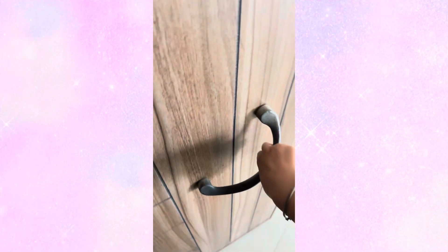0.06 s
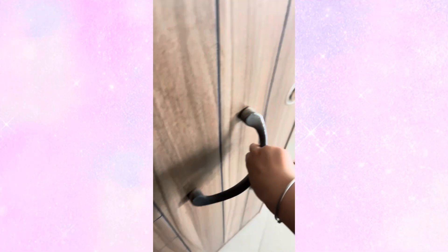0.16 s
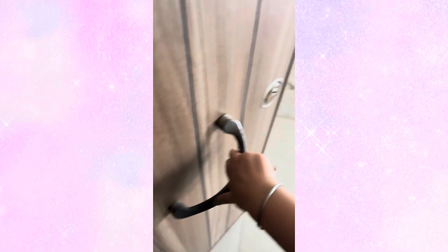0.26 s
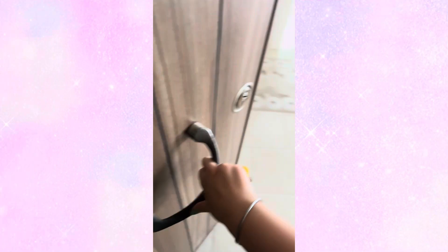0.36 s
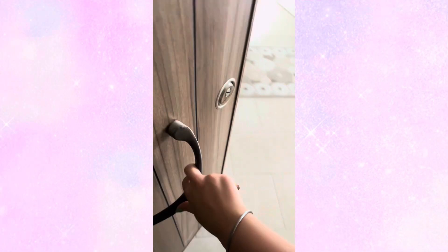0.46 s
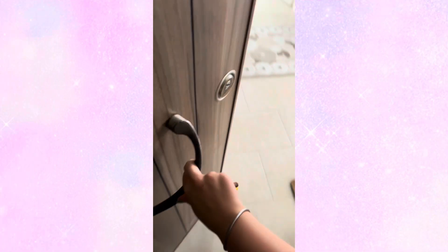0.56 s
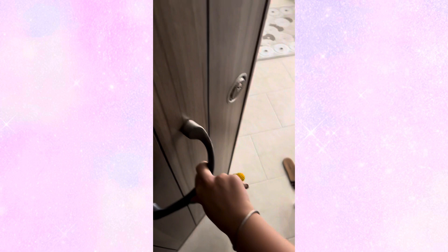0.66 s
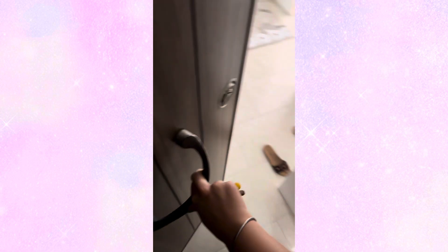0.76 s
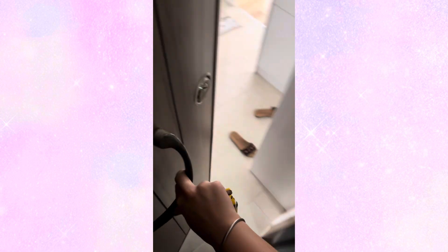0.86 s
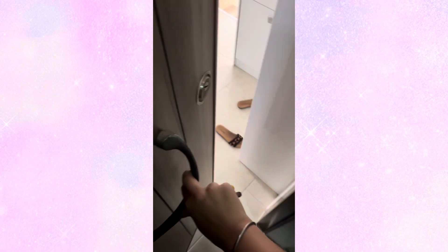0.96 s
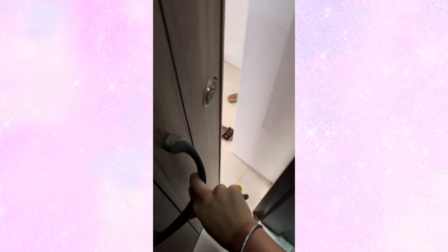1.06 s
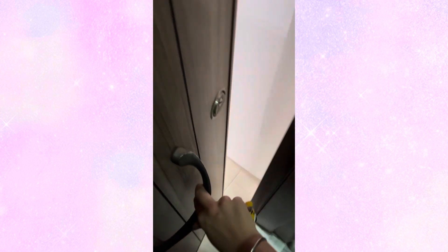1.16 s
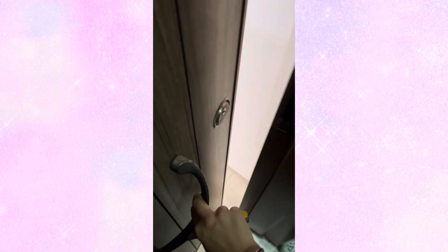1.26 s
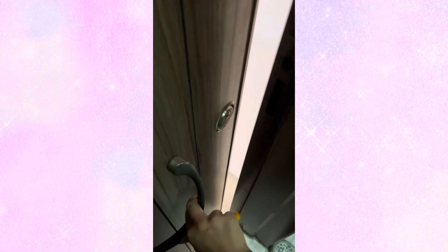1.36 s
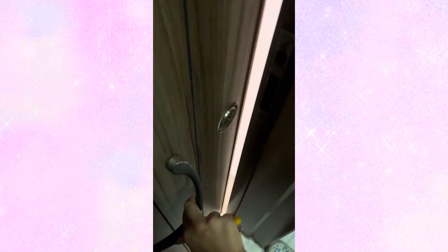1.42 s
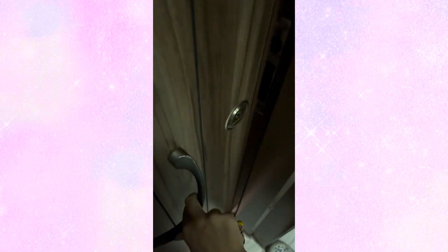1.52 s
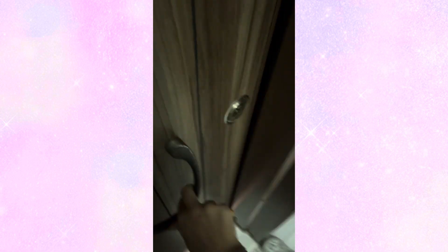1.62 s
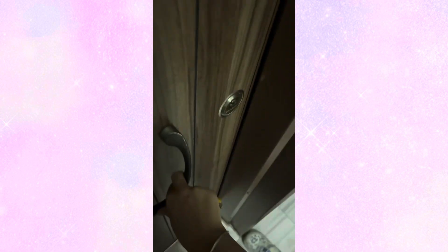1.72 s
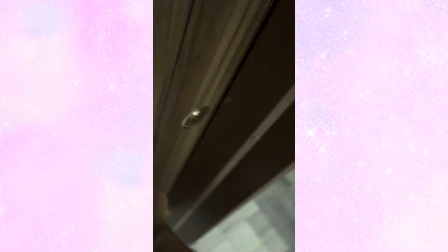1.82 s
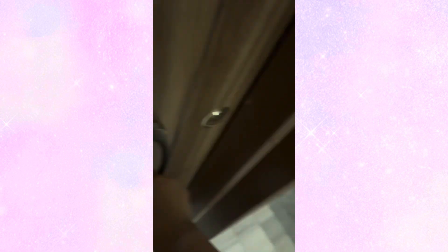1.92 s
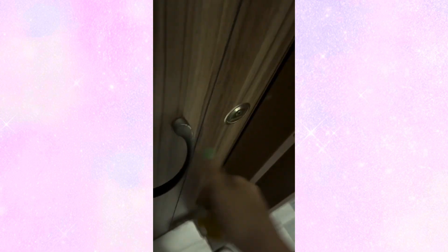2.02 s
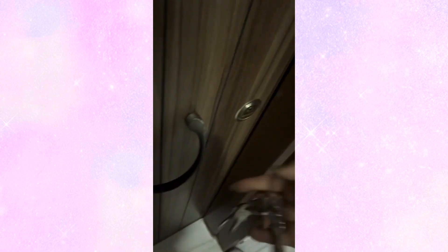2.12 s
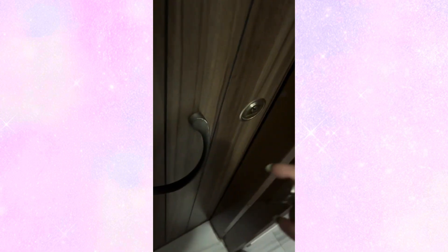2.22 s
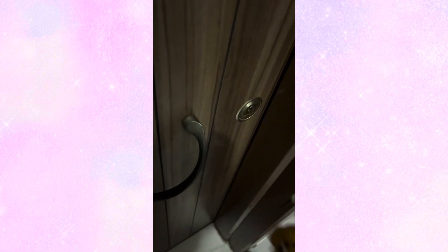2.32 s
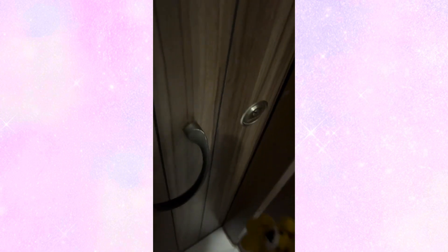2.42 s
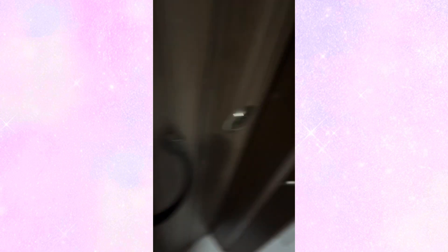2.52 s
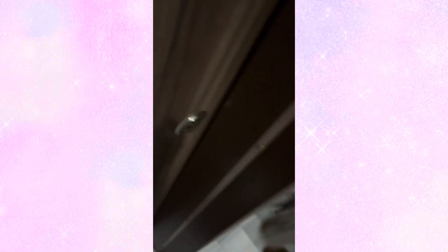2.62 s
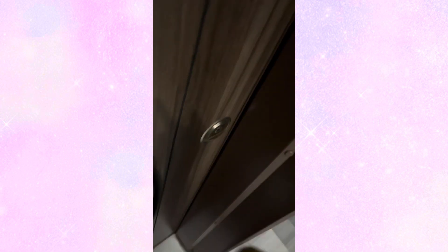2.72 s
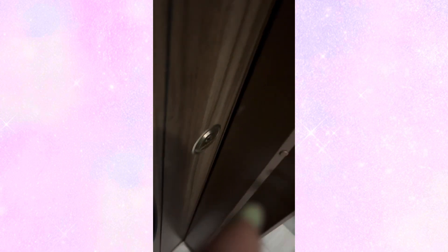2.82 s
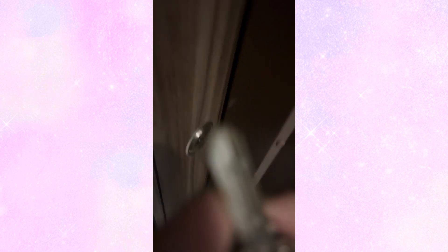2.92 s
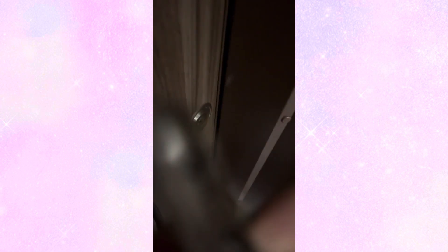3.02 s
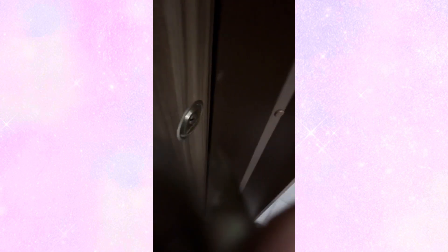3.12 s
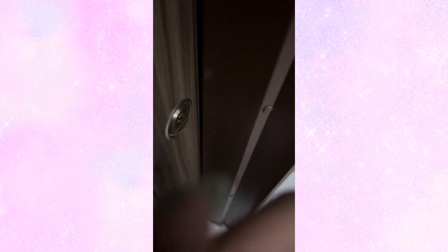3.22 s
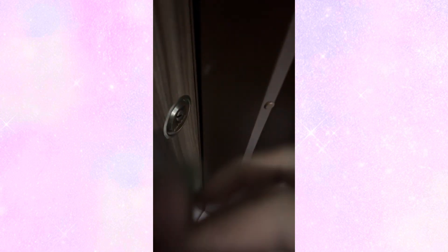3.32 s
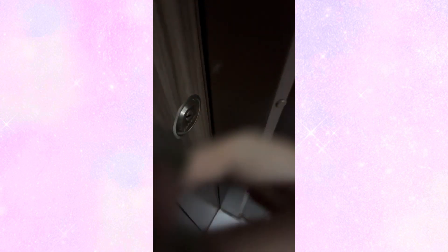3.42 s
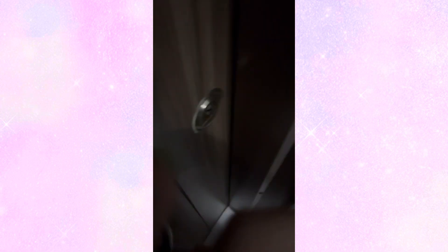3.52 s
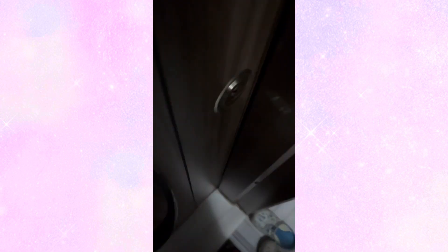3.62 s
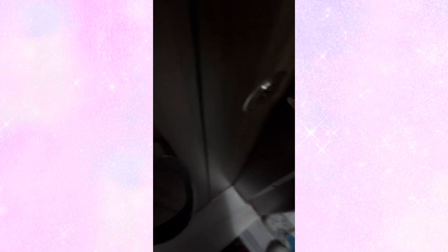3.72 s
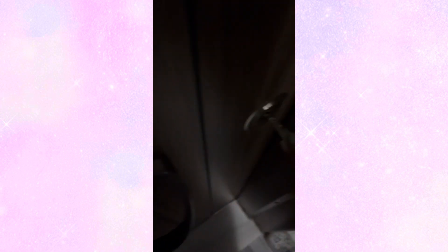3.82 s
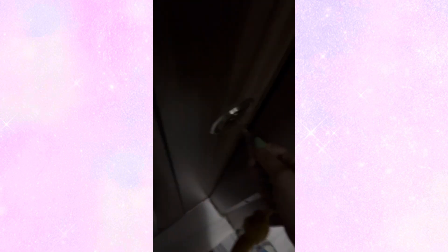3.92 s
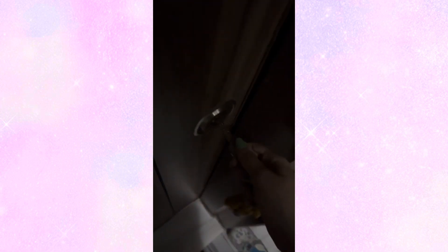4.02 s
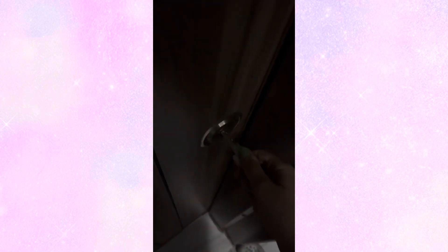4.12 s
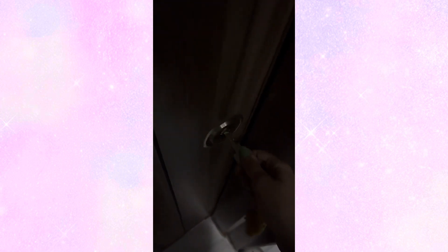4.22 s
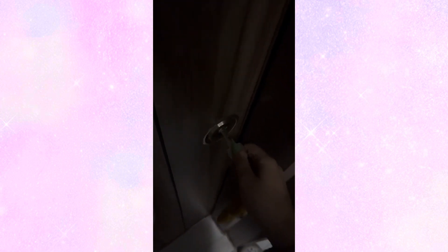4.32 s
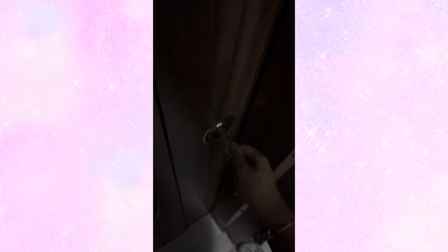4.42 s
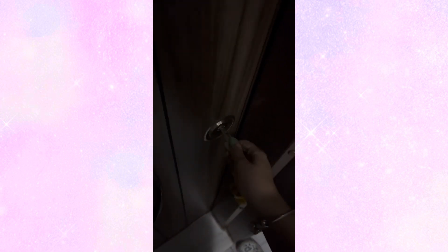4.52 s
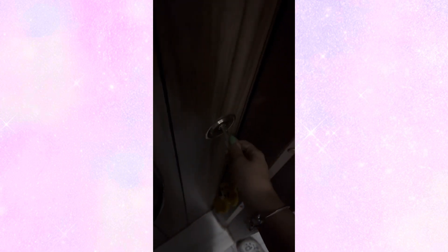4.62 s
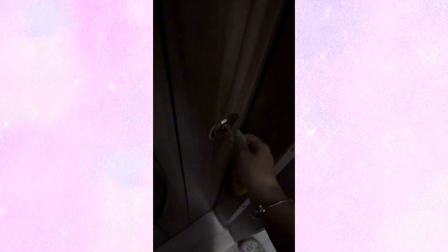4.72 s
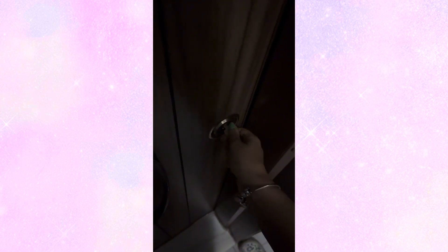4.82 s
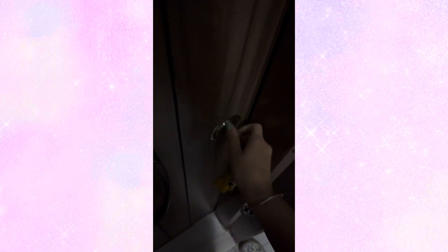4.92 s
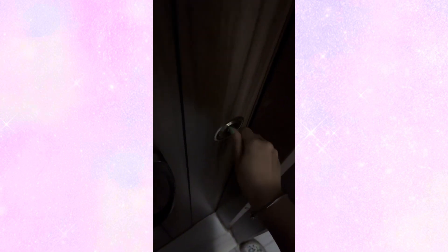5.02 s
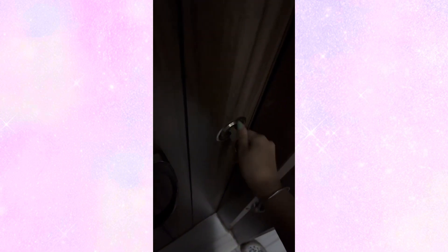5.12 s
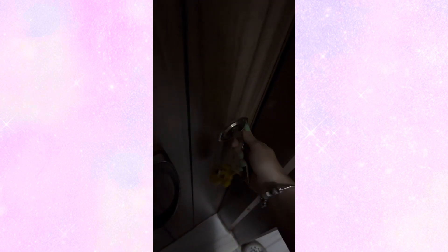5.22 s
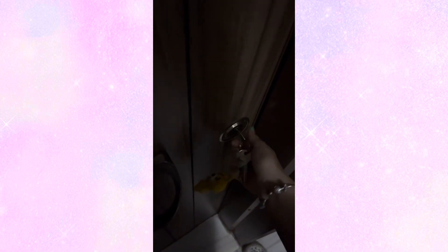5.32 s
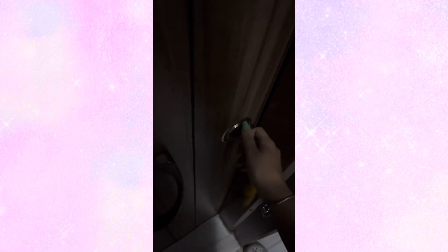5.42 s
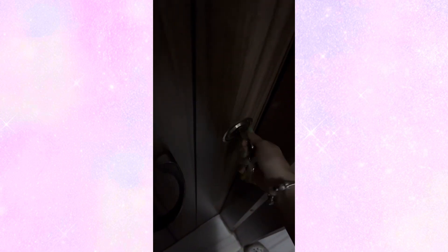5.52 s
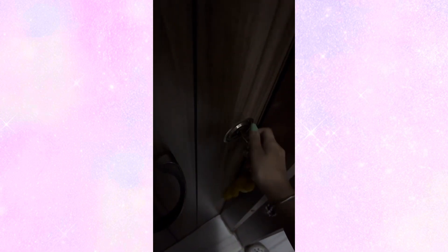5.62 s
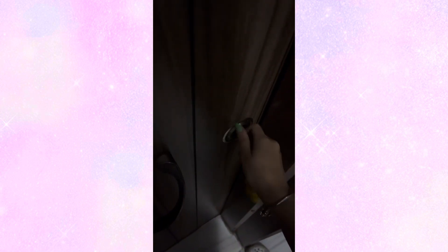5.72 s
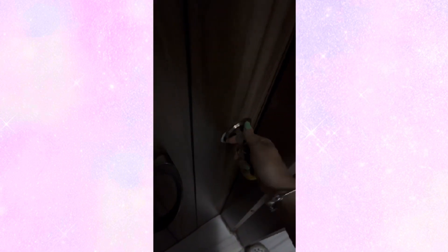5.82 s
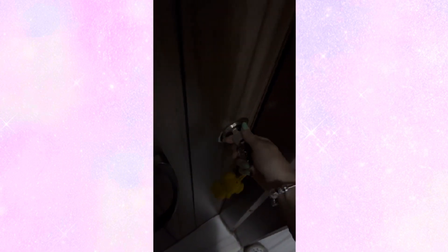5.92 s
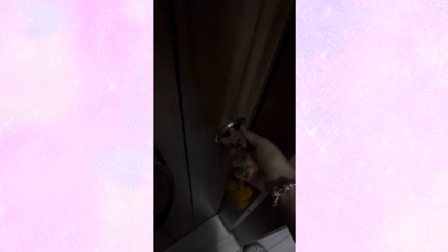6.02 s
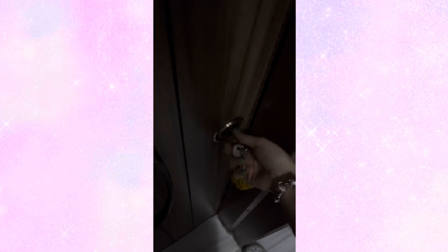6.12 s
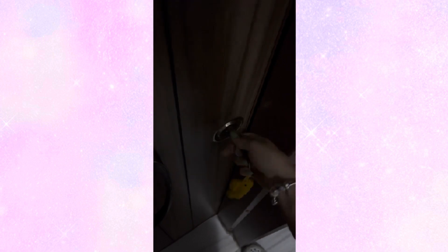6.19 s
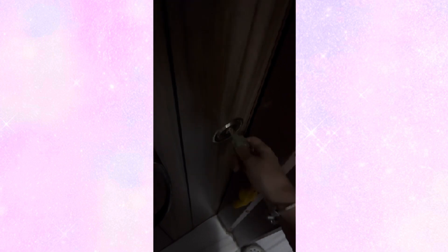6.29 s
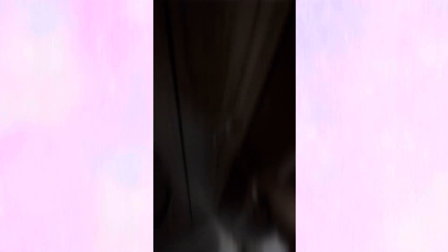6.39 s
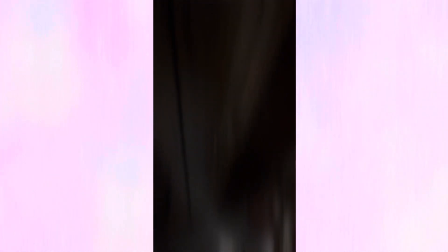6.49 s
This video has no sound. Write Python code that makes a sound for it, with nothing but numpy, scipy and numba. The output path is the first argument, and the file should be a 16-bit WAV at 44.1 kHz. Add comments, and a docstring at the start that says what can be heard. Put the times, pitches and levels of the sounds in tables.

```python
"""First a hand rustles on a wooden front door and keys clink faintly; then the door is pulled shut on its
latch, the bunch swings and jangles, and a key slides into the lock and throws the bolt. Each blow rings
the metal lock, the panels and the door leaf; brass keys tick and ring until fingers damp them; seal and
knuckles bump softly. A hard stairwell answers, and a phone close by hears it all through two ports."""
import sys
import numpy as np
from scipy import signal
from scipy.fft import rfft, irfft, next_fast_len
from scipy.io import wavfile
from numba import njit

SR = 44100
rng = np.random.default_rng(int(sys.argv[2]) if len(sys.argv) > 2 else 0)


def transcribe(u):
    """Save the signal u as a 16-bit wav file named by the first command-line argument.

    u: samples, shape (n,) or (channels, n), limited to [-1, 1]; the rate is SR.
    q: integer samples, one column per channel.
    """
    v = np.clip(np.atleast_2d(u).T, -1, 1)
    q = np.round(v * 32767).astype(np.int16)
    wavfile.write(sys.argv[1], SR, q)


N = 289031

# Fader rides for skin and sleeve rubbing, the leaf murmuring under the hand, the phone's low sway and
# the swinging keys. Each row: time in seconds, relative level in dB.
RUB_RIDE = [(0.0, -52), (0.148, -66.5), (0.388, -66), (0.532, -72), (0.86, -62), (0.98, -73.5),
            (1.18, -65.5), (1.338, -61.5), (2.45, -63), (2.92, -69.5), (3.06, -59.5), (3.35, -71.5),
            (3.5, -64), (3.66, -69), (3.9, -64.5), (4.36, -81), (4.95, -68), (5.11, -51), (5.75, -54),
            (5.954, -63), (6.176, -63.5), (6.306, -52), (6.55, -72)]
MURMUR_RIDE = [(0.0, -44.5), (0.3, -57), (1.2, -79), (1.62, -76), (1.77, -28), (1.9, -32), (2.24, -51),
               (2.75, -65.5), (3.19, -70), (3.4, -52.5), (3.5, -70), (3.72, -72), (3.84, -50), (4.5, -56),
               (4.92, -37), (5.06, -46), (5.22, -34.5), (5.6, -38.5), (5.85, -38), (6.2, -47), (6.31, -39),
               (6.42, -62), (6.55, -55)]
SWAY_RIDE = [(0.0, -76), (1.2, -84), (1.62, -50), (1.9, -39), (2.24, -65), (2.53, -56), (2.7, -49),
             (2.85, -62), (3.2, -57), (3.42, -42.5), (3.7, -76), (4.23, -48.5), (4.55, -51.5), (4.65, -67),
             (4.73, -31), (4.92, -31), (5.06, -53), (5.35, -59), (6.2, -71), (6.35, -53), (6.55, -61)]
SWING_RIDE = [(0.0, -85), (0.36, -61), (0.56, -72.5), (1.48, -68.5), (1.8, -51), (1.9, -61), (2.53, -59.5),
              (2.7, -47), (2.83, -57.5), (3.34, -74.5), (3.44, -56), (3.7, -63), (4.65, -93), (4.72, -42),
              (4.9, -79), (5.05, -49), (5.22, -59), (5.31, -46), (5.75, -53.5), (5.95, -65), (6.2, -61),
              (6.31, -45.5), (6.55, -67)]
# Soft bumps of door seal, palm and knuckles.
# Each row: start in seconds, relative level in dB, pitch in Hz, t60 in seconds.
BUMPS = [(0.054, -35, 168.5, 0.12), (1.607, -18, 339, 0.3), (1.68, -15, 274, 0.2),
         (1.802, -6.5, 225.7, 0.089), (1.83, -24, 152.2, 0.4), (2.65, -38, 74.3, 0.2),
         (3.32, -11, 114, 0.056), (3.386, -21, 46.6, 0.099), (3.773, -19, 173.2, 0.15),
         (4.135, -47.5, 224, 0.15), (4.546, -30, 214, 0.18), (4.72, -30, 116, 0.17),
         (4.778, -17, 281.4, 0.21), (4.829, -19, 100, 0.19), (4.829, -25, 295.3, 0.21),
         (5.3, -19.5, 417.4, 0.24), (5.627, -20, 221, 0.16), (6.078, -21.5, 177, 0.088),
         (6.334, -19, 131, 0.097), (6.384, -14, 100, 0.073)]
# Keys meeting on the ring.
# Each row: start in seconds, relative level in dB, contact spread in ms, t60 of finger damping in ms.
KEY_CLINKS = [(0.219, -57, 2.3, 60), (0.228, -45, 6.4, 190), (0.365, -54, 12, 100), (0.485, -55.5, 15, 130),
              (1.003, -55.5, 5.8, 55), (2.037, -45.5, 7, 120), (2.054, -42.5, 12, 80), (2.165, -39, 18, 95),
              (2.2, -45, 7.2, 170), (2.226, -30, 1.7, 34), (2.237, -32.5, 2.6, 220),
              (2.368, -34.5, 0.78, 27), (2.45, -35.5, 0.8, 270), (2.471, -41.5, 3.4, 210),
              (2.659, -41.5, 2.1, 29), (2.683, -41, 14, 53), (2.787, -36, 4.1, 28), (2.872, -39, 2, 190),
              (2.925, -45, 3, 20), (2.977, -50, 2.3, 68), (2.99, -39.5, 12.4, 46), (3.127, -48.5, 0.99, 14),
              (3.27, -44.5, 4, 60), (3.296, -37.5, 1.5, 25), (3.309, -44, 4.7, 55), (3.327, -30, 1.8, 8.3),
              (3.35, -45, 5.8, 40), (3.369, -27, 8.1, 160), (3.397, -20.5, 1.07, 800),
              (3.406, -25.5, 5.7, 930), (3.465, -30, 3.8, 1200), (3.49, -39, 10, 540),
              (3.537, -35, 10, 150), (3.573, -28.5, 9.3, 180), (3.594, -40, 2.6, 84), (3.612, -35, 4.7, 34),
              (3.631, -28, 0.54, 67), (3.634, -29, 5.8, 28), (3.687, -44, 2.4, 19), (3.916, -38, 4.5, 52),
              (4.733, -38.5, 6, 86), (4.807, -24, 5.5, 58), (4.869, -36, 7, 130), (5.168, -44, 3.4, 47),
              (5.67, -38.5, 16, 270), (6.255, -48, 7.8, 84), (6.35, -52, 7.2, 95)]
# Blows and drags on latch, lock and handle.
# Each row: start in seconds, relative metal, wood and treble levels in dB, contact spread in ms.
DOOR_BLOWS = [(0.308, -51, -48.5, -71, 2.8), (0.359, -54, -56, -57, 10.5), (0.452, -36, -42.5, -79, 0.93),
              (0.703, -46, -46.5, -78, 1.6), (0.754, -47, -55.5, -70, 2.3), (0.988, -57, -79, -51, 1.2),
              (1.178, -47, -77, -64, 4.1), (1.329, -53, -83, -65.5, 3.7), (1.528, -50, -53.5, -83, 8.1),
              (1.592, -24.5, -46, -54, 8.1), (1.606, -14, -23.5, -27, 5.9),
              (1.675, -16.5, -19, -16.5, 3.85), (1.686, -19, -24, -47, 4), (1.781, -23.5, -31.5, -31, 12),
              (1.796, -12.5, -24, -18.5, 6.5), (3.058, -52, -57, -57, 11.4), (3.334, -41, -51, -51, 16),
              (3.841, -27.5, -32.5, -47, 1.53), (3.919, -36.5, -65, -37.5, 4.7),
              (3.969, -38.5, -47.5, -38.5, 3.9), (4.053, -47, -58, -55, 2.7), (4.067, -38, -50.5, -38, 18),
              (4.142, -38, -46, -36, 4), (4.15, -36, -51.5, -41, 13), (4.282, -41, -50.5, -43, 9.3),
              (4.294, -29.5, -44, -35, 3.9), (4.512, -48, -64, -49, 9.3), (4.528, -33, -46.5, -37.5, 2.4),
              (4.701, -54, -49, -44, 5.8), (4.719, -50, -44.5, -45, 2.8), (4.733, -43.5, -44, -53, 11),
              (4.755, -35, -42.5, -34.5, 16), (4.799, -38, -31.5, -26.5, 2), (4.8, -23, -33.5, -45, 5),
              (4.956, -47, -47, -47.5, 2.7), (5.03, -34.5, -48, -34.5, 9.4),
              (5.046, -30.5, -49, -39.5, 9.8), (5.151, -31, -48.5, -33.5, 4.6), (5.21, -28, -32, -40, 4.2),
              (5.227, -32, -33, -64, 8), (5.269, -30.5, -24.5, -58, 7.3), (5.287, -18.5, -19.5, -24.5, 1.9),
              (5.291, -23.5, -19, -45, 4.2), (5.296, -14.5, -21, -47, 0.96),
              (5.306, -23.5, -26.5, -57, 7.7), (5.364, -45, -33.5, -28.5, 4), (5.46, -42, -31.5, -42, 3.7),
              (5.538, -36, -39, -59, 6.7), (5.608, -58, -38.5, -38, 2.8), (5.668, -74, -38.5, -41.5, 6.3),
              (5.727, -38.5, -46, -36.5, 1.5), (5.75, -40, -44, -44, 13.4), (5.855, -34, -42, -35.5, 7.1),
              (5.983, -64, -46.5, -49, 0.84), (6.127, -46.5, -49.5, -46, 3.8),
              (6.144, -37, -48, -44.5, 14.3), (6.245, -60, -50.5, -47, 3), (6.262, -44, -47, -38, 9.1),
              (6.292, -44, -51, -43, 10), (6.338, -29, -35, -31.5, 1.8), (6.35, -28, -59, -39.5, 2.7),
              (6.396, -47, -69, -41, 1.7), (6.523, -46.5, -52, -46, 13)]
# Resonances of the door leaf, the key blades, the lock case and the door panels.
# Each row: pitch in Hz, relative level in dB, free-ringing t60 in seconds.
LEAF_MODES = [(51, -44, 0.067), (112.9, -13.5, 0.31), (149, -6.5, 0.26), (190.6, -7, 0.18),
              (226.6, -1, 0.46), (242, 3, 0.061), (270.8, 2.5, 0.19), (310.6, -10.5, 0.29),
              (348.4, -4.5, 0.14), (410.6, -2.5, 0.048)]
BLADE_MODES = [(2150, -22, .06), (4050, -22, .12), (5110, -18, .15), (5320, -22, .12), (6195, -5, .3),
               (6512, -4, .4), (7100, -18, .15), (7610, -9, .3), (8845, -3, .35), (9160, -10, .2),
               (10200, -14, .15), (10890, -3, .4), (11020, -11, .2), (11605, -10, .2), (11650, -5, .3),
               (11680, -8, .2), (11990, -9, .12), (12300, -10, .08), (12520, -7, .06), (12850, -9, .12),
               (13160, -11, .1), (13622, -3, .25), (13990, -11, .12), (14330, -5, .25), (14355, -2, .25),
               (14950, -9, .2), (15220, -8, .2), (15325, -3, .25), (15700, -8, .15)]
CASE_MODES = [(1500, -5, .04), (1900, -8, .03), (2230, -6, .03), (2400, -5, .035), (2790, -6, .03),
              (2940, -6, .03), (3285, -4, .035), (3600, -7, .03), (4030, -6, .03), (4200, -8, .03),
              (4620, -8, .025), (5180, -10, .025)]
WOOD_PANEL_MODES = [(428, -4, .09), (549, -6, .07), (650, -7, .06), (730, -7, .05), (884, -4, .06),
                    (930, -5, .05), (1033, -6, .04), (1180, -7, .04), (1380, -6, .04)]
# Tone curves for room air, skin rub, key tick, metal crack, wooden knock and a blow's bright sheen.
# Each row: frequency in Hz, relative gain in dB.
AIR_EQ = [(20, -27), (40, -5), (145, 10.5), (500, 0.5), (960, -4), (2840, -9.5), (6000, -23), (9500, -30),
          (13000, -15), (16000, -36)]
RUB_EQ = [(180, -31.5), (300, -21), (412, -10), (885, -6), (1190, -4), (2000, -5.5), (3030, -1),
          (9710, -20), (16000, -29)]
TICK_EQ = [(2500, -17), (6000, -3.5), (9000, -5), (11500, 8), (12600, -3.5), (13800, 4.5), (15500, -20.5)]
CRACK_EQ = [(700, -61), (1500, -5), (2500, -0.5), (4500, -4), (7000, -13), (14000, -20)]
KNOCK_EQ = [(200, -50), (450, -2.5), (900, 1), (1500, -4), (2500, -33)]
SHEEN_EQ = [(4000, -17), (6000, -4), (9000, 1.5), (12500, -2.5), (15500, 4)]
# The stairwell's tail. Each row: band centre in Hz, t60 in seconds, relative level in dB.
STAIRWELL_BANDS = [(61.7, 0.33, -20), (152, 1, -9), (385, 0.87, -14), (787, 1, -16.5), (1630, 0.95, -16),
                   (3800, 0.71, -15), (6100, 0.74, -19.5), (12100, 0.23, -16.5)]
# Stereo width of the ports. Each row: frequency in Hz, share of the left-right difference kept.
PORT_WIDTH = [(40, 0.37), (150, 0.19), (300, 0.63), (700, 0.9), (2500, 0.82), (4500, 1), (5500, 0.59),
              (9000, 0.16), (15000, 0.6)]

KEY_IN_S = 3.8  # from here on the bunch hangs at the lock
TREBLE_HZ, TREBLE_LAG_S, TREBLE_TURN_RAD = 4300, .000227, -1.15  # right port against left
LOW_CUT_HZ, TOP_HZ = 100, 15800


def undb(db):
    return 10 ** (np.asarray(db) / 20)


def level(x, db):
    """Set the rms."""
    return x * undb(db) / np.sqrt(np.mean(x ** 2))


def fader(ride):
    """A ride's gain at every sample."""
    return undb(np.interp(np.arange(N) / SR, *np.transpose(ride)))


def per_bin(table, size):
    """A frequency curve read at every bin of a transform."""
    hz, value = np.transpose(table)
    return np.interp(np.log(np.fft.rfftfreq(size, 1 / SR) + 1), np.log(hz), value)


def colour(x, eq):
    """Apply a tone curve, keeping the power of white noise."""
    size = next_fast_len(N)
    gain = undb(per_bin(eq, size))
    return irfft(rfft(x, size) * gain / np.sqrt(np.mean(gain ** 2)), size)[..., :N]


def grit(rough_db, rate_hz):
    """Noise broken into tiny uneven impacts, one stream for each port."""
    grain = int(SR / rate_hz)
    strength = np.repeat(undb(rough_db * rng.exponential(size=N // grain + 1)), grain)[:N]
    return level(strength * rng.standard_normal((2, N)), 0)


def contacts(times, db, spread_ms):
    """Each contact swells for one spread and dies away; overlaps add in power."""
    envelope = np.zeros(N)
    for start, gain, width in zip(times, undb(db), np.clip(spread_ms, .3, 40) * SR / 1000):
        i = int(start * SR)
        age = np.arange(min(int(9 * width), N - i)) / width
        span = slice(i, i + len(age))
        envelope[span] = np.hypot(envelope[span], gain * (age * np.exp(1 - age)) ** 1.4)
    return envelope


def shove(times, db, spread_ms):
    """Noisy force, harder for a short blow, and the number of the latest blow at every sample."""
    width = np.clip(spread_ms, .3, 40) * SR / 1000
    force = contacts(times, db - 10 * np.log10(width), spread_ms) * rng.standard_normal(N)
    latest = np.clip(np.searchsorted(times, np.arange(N) / SR) - 1, 0, None)
    return force, latest


@njit
def ring(force, latest, pole, coupling):
    """One mode as each port hears it; loss and coupling follow the latest blow."""
    out, left, right = np.empty((2, len(force))), 0j, 0j
    for i in range(len(force)):
        blow = latest[i]
        left = left * pole[blow] + (force[i] + 1e-18) * coupling[blow, 0]
        right = right * pole[blow] + (force[i] + 1e-18) * coupling[blow, 1]
        out[0, i], out[1, i] = left.imag, right.imag
    return out


def strike(force, latest, modes, scatter_db, width, held_t60=9.):
    """Every blow lands elsewhere: it shares its energy anew among the modes and shifts their phases."""
    chance = rng.standard_normal((latest.max() + 1, len(modes), 3))
    share = undb(np.transpose(modes)[1] + scatter_db * chance[:, :, 0])
    share /= np.linalg.norm(share, axis=1, keepdims=True)
    out = 0
    for k, (hz, _, t60) in enumerate(modes):
        loss = np.log(1000) / SR * (1 / t60 + 1 / held_t60) * np.ones(len(chance))
        coupling = share[:, k, None] * np.exp(1j * width * chance[:, k, 1:])
        out = out + ring(force, latest, np.exp(2j * np.pi * hz / SR - loss), coupling)
    return out


def room_air():
    """A faint, steady bed of dark noise."""
    return level(colour(rng.standard_normal((2, N)), AIR_EQ), -68)


def hand():
    """Skin and cloth rub; the shifting grip keeps the door leaf murmuring and the phone swaying."""
    rub = level(colour(grit(2.2, 55), RUB_EQ), 6) * fader(RUB_RIDE)
    grip = np.arange(N) // int(.1 * SR)
    murmur = strike(grit(1.5, 40)[0], grip, LEAF_MODES, scatter_db=3, width=.8)
    sway = colour(grit(.9, 43), [(15, -23), (35, 3.5), (60, 12), (120, -34.5)])
    return rub + level(murmur, -2.4) * fader(MURMUR_RIDE) + level(sway, -6.5) * fader(SWAY_RIDE)


def soft_bumps():
    """Rubber and flesh give a few low cycles: three partials with a cushioned attack."""
    out, t = np.zeros(N + SR), np.arange(SR // 2) / SR
    attack = 1 - np.exp(-t / .029)
    for start, db, hz, t60 in BUMPS:
        phase = 2 * np.pi * hz * t
        wave = np.sin(phase) + .5 * np.sin(1.55 * phase) + .61 * np.sin(.622 * phase)
        i = int(start * SR)
        out[i:i + len(t)] += undb(db - 60 * t / t60) * attack * wave
    return out[:N]


def keys():
    """Thin brass blades tick and chatter together and ring until the fingers damp them."""
    times, db, spread_ms, held_ms = np.transpose(KEY_CLINKS)
    held_t60 = np.clip(held_ms, 5, 1200) / 1000
    blades = strike(*shove(times, db, spread_ms), BLADE_MODES, scatter_db=7.3, width=1, held_t60=held_t60)
    tick = colour(contacts(times, db - 4, .7 * spread_ms) * grit(2, 1500), TICK_EQ)
    chatter = colour(contacts(times, db - 15, spread_ms + .07 * held_ms) * grit(2.5, 500), TICK_EQ)
    # the swinging bunch keeps touching lightly, a new pair of blades every 13 ms
    touches = grit(3, 280)
    pair = np.arange(N) // int(.013 * SR)
    shimmer = strike(touches[0], pair, BLADE_MODES, scatter_db=22, width=.67, held_t60=.087)
    jingle = level(shimmer, -7) + level(colour(touches, TICK_EQ), -2)
    return undb(5) * blades + tick + chatter + jingle * fader(SWING_RIDE)


def lock_and_door():
    """Each blow cracks, rings the lock case, knocks on the panels and thuds in the door leaf."""
    times, metal_db, wood_db, treble_db, spread_ms = np.transpose(DOOR_BLOWS)
    crack = colour(contacts(times, metal_db - 1.5, spread_ms) * grit(2, 1200), CRACK_EQ)
    case = strike(*shove(times, metal_db - 2, spread_ms), CASE_MODES, scatter_db=5, width=.7)
    knock = colour(contacts(times, wood_db + .5, 1.8 * spread_ms) * grit(2.5, 500), KNOCK_EQ)
    panels = strike(*shove(times, wood_db + 1.84, spread_ms), WOOD_PANEL_MODES, scatter_db=1.7, width=.72)
    leaf = strike(*shove(times, wood_db - .5, spread_ms + 3), LEAF_MODES, scatter_db=.8, width=1)
    sheen = colour(contacts(times, treble_db + 1.5, spread_ms) * grit(2, 1500), SHEEN_EQ)
    # once the key is in, every blow shakes the bunch too
    shake_db = treble_db + np.where(times > KEY_IN_S, 2, -60)
    shaken = strike(*shove(times, shake_db, spread_ms), BLADE_MODES, scatter_db=6, width=1, held_t60=.1)
    low_cut = signal.butter(2, LOW_CUT_HZ, "high", fs=SR, output="sos")  # keeps rumble out of the blows
    return signal.sosfilt(low_cut, shaken + crack + case + knock + panels + leaf + sheen)


def stairwell(send):
    """Hard walls return dense echoes, dying band by band, different at each port."""
    size = int(1.3 * SR)
    t, tail = np.arange(size) / SR, 0
    octave = np.log2(np.fft.rfftfreq(size, 1 / SR) + 1)
    for hz, t60, db in STAIRWELL_BANDS:
        bell = np.exp(-((octave - np.log2(hz)) / .73) ** 2)
        band = irfft(rfft(rng.standard_normal((2, size))) * bell, size)
        tail = tail + band * undb(db - 60 * t / t60)
    attack = 1 - np.exp(-t / .00067)
    return signal.fftconvolve(send[None], undb(-24) * tail * attack, axes=1)[:, :N]


def scene():
    """Door and keys feed the stairwell; bumps, hand and air stay dry."""
    door, bunch, air = lock_and_door(), keys(), room_air()
    send = door[0] + undb(-14) * bunch[0]  # the body shades the keys
    return door + bunch + stairwell(send) + soft_bumps() + hand() + air


def record(dry):
    """The ports share most bass and the right trails in the treble; peaks round off, the top is cut."""
    size = next_fast_len(N + 64)
    hz = np.fft.rfftfreq(size, 1 / SR)
    left, right = rfft(dry, size)
    mid, side = (left + right) / 2, per_bin(PORT_WIDTH, size) * (left - right) / 2
    trail = TREBLE_TURN_RAD - 2 * np.pi * hz * TREBLE_LAG_S + 2 * np.pi
    trail /= 1 + (TREBLE_HZ / (hz + 1)) ** 12  # treble only
    ports = irfft(np.array([mid + side, (mid - side) * np.exp(1j * trail)]), size)[:, :N]
    rounded = .9 * np.tanh(ports / .9)
    return signal.sosfilt(signal.ellip(10, .3, 90, TOP_HZ, fs=SR, output="sos"), rounded)


dry = scene()
out = record(dry)
transcribe(out)
```